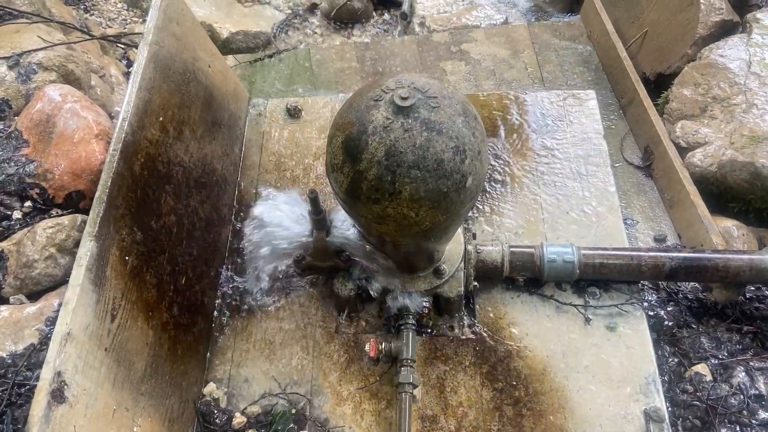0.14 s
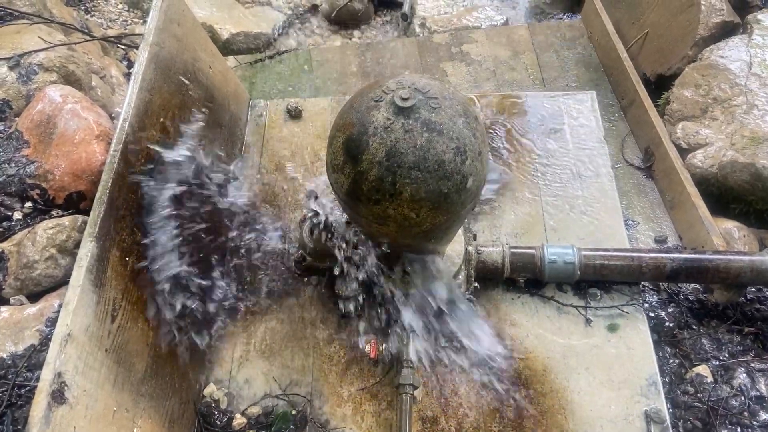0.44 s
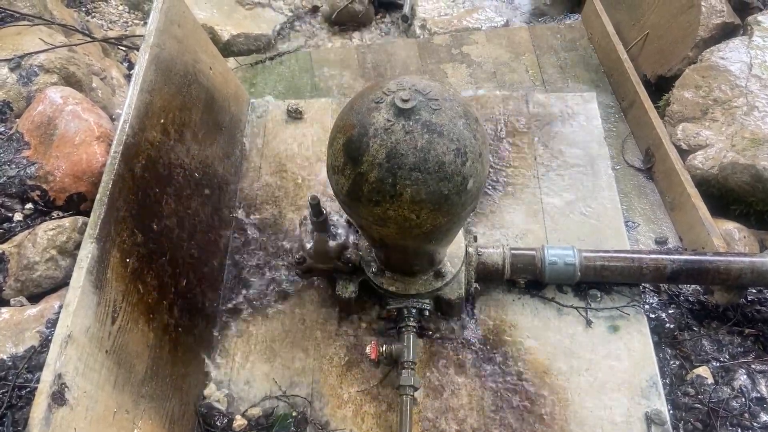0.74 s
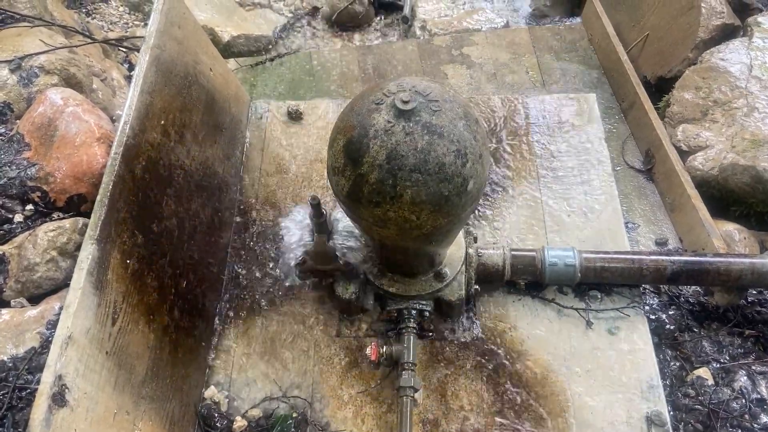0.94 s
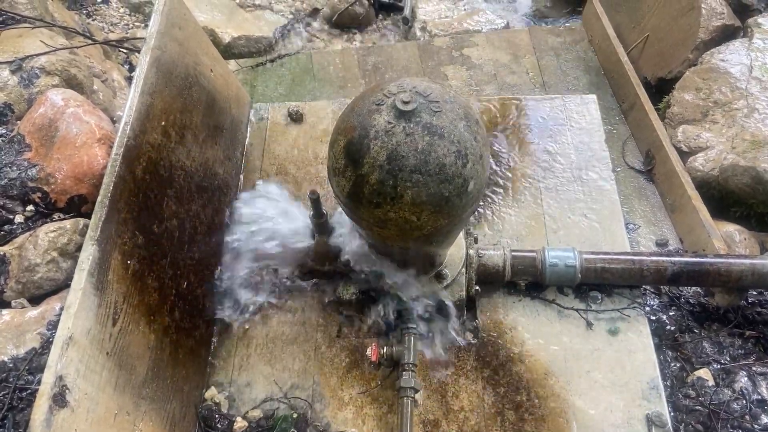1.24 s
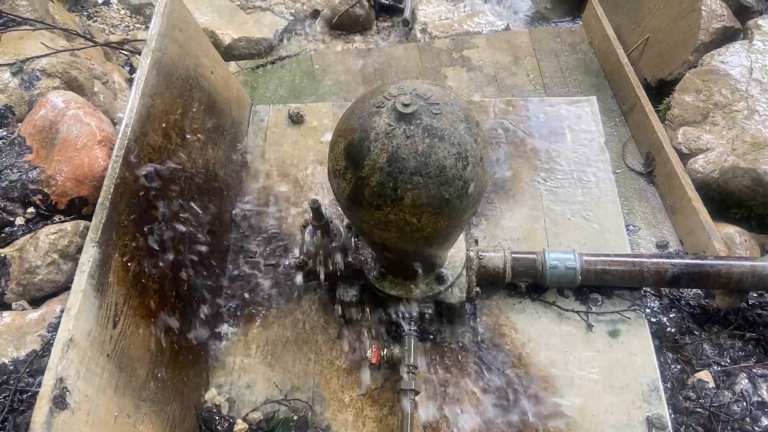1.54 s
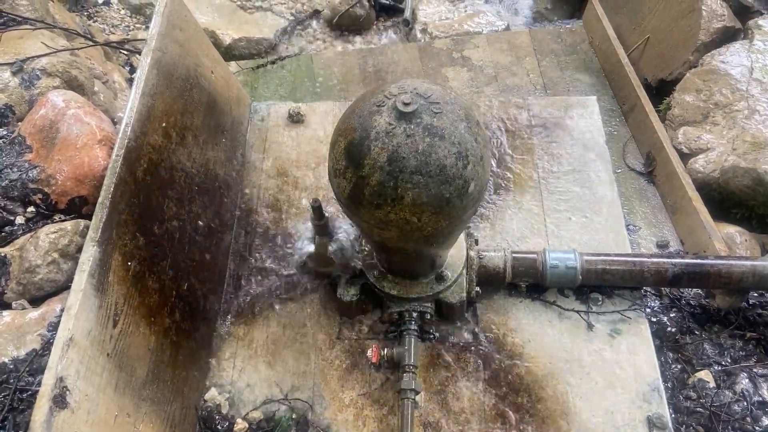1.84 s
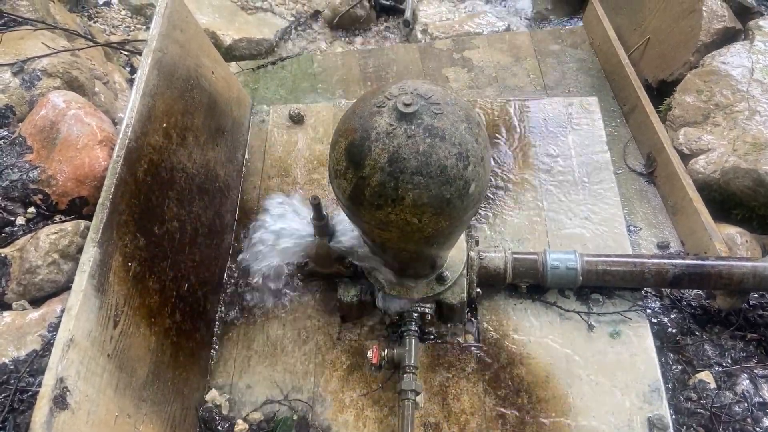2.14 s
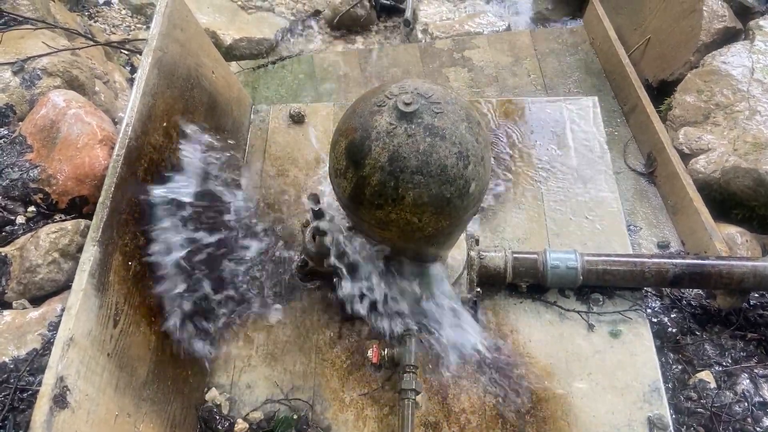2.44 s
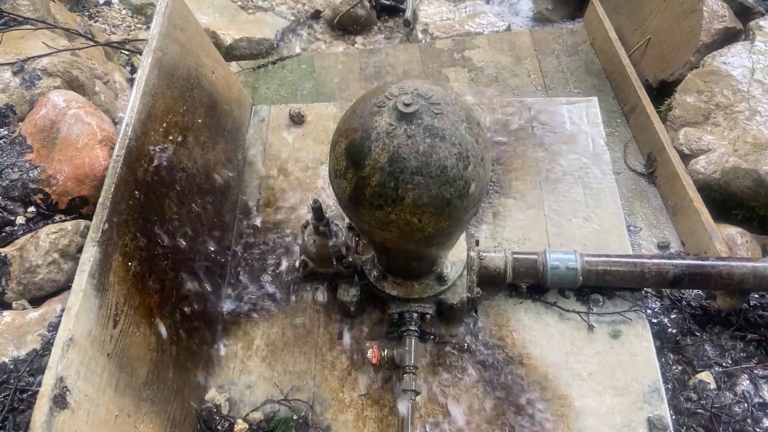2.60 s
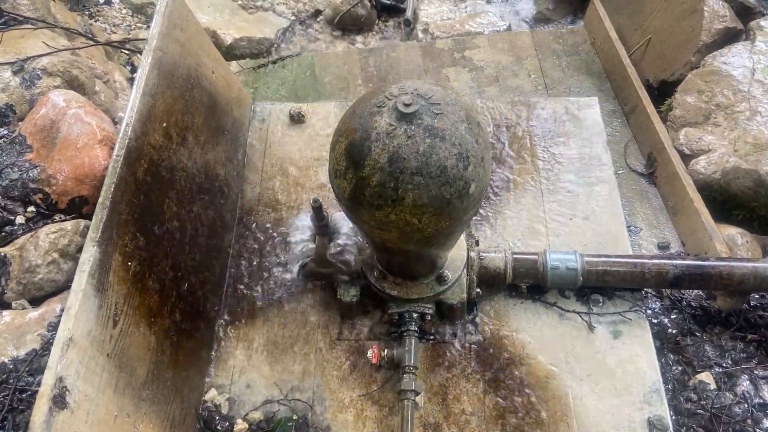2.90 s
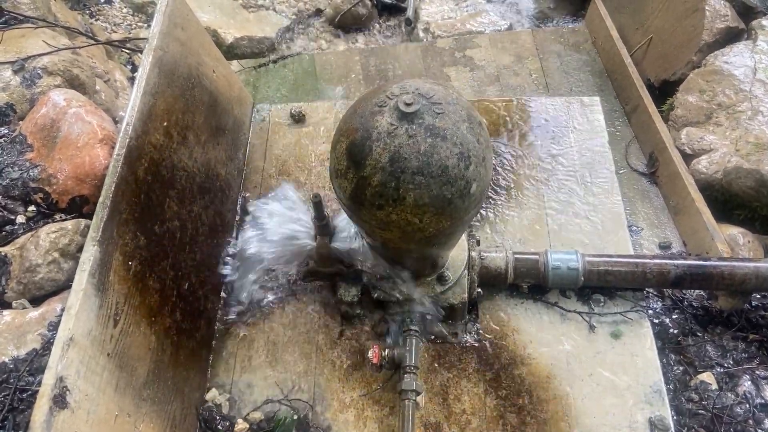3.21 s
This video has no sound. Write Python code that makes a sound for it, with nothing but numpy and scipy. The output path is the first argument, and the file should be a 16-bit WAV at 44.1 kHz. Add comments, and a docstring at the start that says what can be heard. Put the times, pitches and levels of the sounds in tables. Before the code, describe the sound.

A water ram pump knocks about once a second amid splashing, spattering and burbling water outdoors.

```python
"""Hydraulic ram pump beside a stream

A ram pump knocks about once a second on a concrete slab, heard from just above.
Waste water gushes until the valve slams: decaying modes sound the iron and base, a falling chirp the pipe.
Thrown water spatters on a board and the slab, made of shaped noise, random impacts and tiny bubbles.
Rising bubble tones give the steady burble of running water; single fat drops smack or plop."""
import sys
import numpy as np
from scipy import signal
from scipy.fft import rfft, irfft
from scipy.io import wavfile

SR = 44100
rng = np.random.default_rng(int(sys.argv[2]) if len(sys.argv) > 2 else 0)


def to_wav(s):
    """Save 16-bit WAV."""
    ch = np.atleast_2d(s).T  # columns
    pcm = np.round(np.clip(ch, -1, 1) * 32767)  # PCM
    wavfile.write(sys.argv[1], SR, pcm.astype(np.int16))


N = 148176
T = np.arange(N) / SR  # s
HZ = np.maximum(np.fft.rfftfreq(2 * N, 1 / SR), 1)  # bins of the zero-padded spectrum

# Running water, mid and side alike. Each row: frequency in Hz, density in dB per Hz.
STREAM_SPECTRUM = [(20, -83), (45, -69.5), (70, -78.5), (95, -67.5), (135, -62), (200, -67.5), (430, -76.5),
                   (600, -73), (780, -72.5), (1100, -77), (1500, -84.5), (2100, -79), (2500, -87),
                   (3100, -80), (3700, -96), (8000, -100)]
# Thrown water as spray, before its cycle. Each row: frequency in Hz, density in dB per Hz.
SPRAY_SPECTRUM = [(800, -85), (2000, -77), (3000, -76.5), (3650, -78), (4100, -74), (4450, -77.5),
                  (4800, -73), (5300, -74.5), (6300, -72.5), (7250, -70), (8000, -73.5), (8600, -81),
                  (9200, -125), (9900, -83.5), (11300, -86.5), (13000, -93.5), (13900, -93.5), (15000, -99)]
# Thrown water landing, before its swell. Each row: frequency in Hz, density in dB per Hz.
SPLASH_SPECTRUM = [(40, -71), (130, -61), (300, -66.5), (800, -68), (1500, -72), (3000, -91.5), (6000, -78),
                   (12000, -105)]
# Water leaving the waste valve, before its swell. Each row: frequency in Hz, density in dB per Hz.
GUSH_SPECTRUM = [(60, -87), (200, -80), (700, -77), (1200, -71.5), (2200, -78), (5000, -83), (12000, -100)]
# Spray through one cycle. Each row: time from closure in seconds, gain in dB.
SPRAY_CYCLE = [(-.4, -0.8), (-.2, -0.6), (-.01, 0.1), (.03, 6.5), (.08, 1.5), (.16, 2.5), (.3, 0),
               (.45, -1), (.6, -2.4)]
# Single loud drops on slab and puddles.
# Each row: start in seconds, level in dB, pitch in Hz, resonance width in Hz, swell time in seconds.
LOUD_DROPS = [(.0613, -29, 7100, 2500, .0012), (.0957, -27, 6460, 900, .0016),
              (.2723, -26, 7400, 3000, .0015), (.5652, -22, 6800, 6000, .0013),
              (1.252, -30, 2200, 2500, .003), (1.7554, -25, 4900, 3000, .0012),
              (2.6519, -28, 7600, 1200, .0015), (2.6823, -26, 6800, 900, .0016),
              (2.7142, -22.5, 7200, 2500, .0012), (2.8384, -27, 5500, 2200, .0013),
              (3.066, -38, 2080, 220, .007)]
# Valve closures. Each row: start in seconds, level in dB.
STROKES = [(0.338, 0), (1.3458, 0), (2.3581, 0)]
# Contacts within one closure. Each row: lag in seconds, level in dB.
CONTACTS = [(0.001, -6), (0.0035, -7), (0.0072, 0), (0.0118, -11), (0.0165, -12), (0.0208, -10),
            (0.0265, -11), (0.088, -15), (0.099, -16.5), (0.112, -19)]
# Modes of the iron body. Each row: frequency in Hz, relative level in dB, T60 in seconds.
IRON_MODES = [(463, -5.5, 0.08), (713, -0.5, 0.064), (736, -4.5, .035), (937, -0.5, 0.098),
              (1100, -19, 0.089), (1220, -0.5, 0.063), (1306, -5, 0.042), (1780, -10, 0.065),
              (1916, -14.5, 0.059), (2110, -17, 0.038), (2415, -12.5, 0.038), (2925, -7, .03),
              (3207, -29, 0.041), (4680, -17, 0.11)]
# Crack of each contact. Each row: frequency in Hz, relative gain in dB.
CRACK_SPECTRUM = [(150, -32), (330, -4), (650, 0.5), (1200, -5), (2200, -7), (3600, -16), (7000, -14),
                  (9200, -33), (10500, -21), (14000, -39)]
# Modes of the base and air vessel. Each row: frequency in Hz, level in dB, T60 in seconds.
BASE_MODES = [(120, -32.5, .35), (141.7, -20.7, .33), (182.5, -26.3, .33), (204.7, -21, .18),
              (255, -24, .05)]
# Modes of the recoiling water column as the valve reopens.
# Each row: frequency in Hz, level in dB, T60 in seconds.
RECOIL_MODES = [(67, -25.5, .27), (137, -24, .22), (200.5, -25, .17)]
# Bending wave of the drive pipe. Each row: frequency in Hz, relative gain in dB.
PIPE_SPECTRUM = [(45, -35), (70, 5), (95, -18), (125, 3.3), (160, 2.6), (230, 0), (320, -.5), (520, -22),
                 (900, -40), (3000, -100)]
# Gain of the stereo side signal. Each row: frequency in Hz, gain in dB.
SIDE_GAIN = [(60, -12), (150, -14.5), (300, -12.5), (650, -6), (1000, -2.5), (1500, 4.5), (2100, -7.5),
             (2750, -6), (3200, -8.5), (3700, -5.5), (4800, -2), (6800, -7), (7300, 1), (8000, 1),
             (9200, 29), (9900, 7.5), (11000, -1), (12000, -34), (13200, -25), (14000, 0), (15000, 19)]
# Stereo lean. Each row: frequency in Hz, left gain minus right gain in dB.
BALANCE = [(100, -0.2), (300, -4), (650, -7), (1300, 1.9), (2800, -2.5), (6000, -1)]

HUM_HZ, HUM_DB = 68.9, -48.5
HUM_WIDTH_HZ = 8.6  # of each of two equal resonances in series
# Shares are fractions of power; spreads scale exponential random draws.
BUBBLE_CYCLES, BUBBLE_SHARE, BUBBLE_SPREAD_DB = 33, 0.29, 2.5
DROPS_PER_S, DROP_SHARE, DROP_SPREAD_DB, DROP_T60_S = 2500, 0.34, 2, 0.0037
FIZZ_HZ, FIZZ_OCTAVES, FIZZ_T60_S, FIZZ_DB = 6510, 0.9, 0.019, -12.5  # octaves either way
CLUMPS_PER_S, CLUMP_DB = 26, 0.76
SPLASH_PEAK_S, GUSH_RISE_S, GUSH_DB = 0.067, 0.32, -4

PIPE_DB, PIPE_LAG_S, PIPE_SLOPE = 30.3, 0.0258, 1.108
PIPE_REF_HZ, PIPE_LOW_HZ = 250, 39.3  # lag is PIPE_LAG_S at the first, constant below the second
THUMP_LAG_S, RECOIL_LAG_S, RADIATE_HZ = 0.010, 0.0961, 58
IRON_DB, IRON_LOW_HZ, IRON_TOP_HZ = -17.5, 362, 5350
CRACK_DB, CRACK_T60_S, RATTLE_SHARE = -14, 0.027, 0.4
CONTACT_SCATTER_DB = 0.6
KNOCK_SIDE_LAG_S, KNOCK_SIDE_DB = 0.00107, -5.5
LOW_CUT_HZ, TOP_HZ = 34, 14700


def undb(db):
    """Amplitude ratio from dB."""
    return 10 ** (np.asarray(db) / 20)


def unit(x):
    """Scale to unit RMS."""
    return x / np.sqrt(np.mean(x ** 2))


def noise():
    """White noise of unit power."""
    return rng.standard_normal(N)


def gains(points):
    """Gain at every bin, interpolated in dB over log frequency."""
    hz, db = np.array(points, float).T
    return undb(np.interp(np.log(HZ), np.log(hz), db))


def shape(x, response):
    """Filter by a frequency response."""
    return irfft(rfft(x, 2 * N) * response)[..., :N]


def band(hz, width_hz):
    """Response of one resonance."""
    return 1 / (1 + 1j * (HZ - hz * hz / HZ) / width_hz)


def high_pass(x, hz):
    """Second-order low cut."""
    sos = signal.butter(2, hz, "high", fs=SR, output="sos")
    return signal.sosfilt(sos, x)


def delay(x, lag_s):
    """The same sound, later."""
    return np.interp(T - lag_s, T, x, left=0)


def fade(t60_s):
    """Exponential decay, 60 dB in t60_s."""
    return np.exp(-np.minimum(np.log(1000) * T / t60_s, 60))


def ring(modes):
    """Free ringing of a struck object: a sum of decaying sines."""
    return sum(undb(db) * np.sin(2 * np.pi * hz * T) * fade(t60_s) for hz, db, t60_s in modes)


def blend(grains, share):
    """Distinct grains over the noise wash of countless smaller ones."""
    share = np.clip(share, 0, 1)
    return np.sqrt(share) * unit(grains) + np.sqrt(1 - share) * noise()


def mid_side(place):
    """Mid and side weights of a grain, from a random place 0..1."""
    return [np.cos(2 * np.pi * place), np.sin(2 * np.pi * place)]


def water(grains, spectrum):
    """Give water grains a spectrum in dB per Hz."""
    return shape(grains, gains(spectrum)) * np.sqrt(SR / 2)


def burble(count=6000):
    """Bubbles that ring briefly and rise in pitch, in mid and side."""
    out = np.zeros((2, N))
    for when, pitch, size, place in rng.random((count, 4)):
        hz = 250 * 14 ** pitch
        life_s = BUBBLE_CYCLES / hz
        start = int(when * N)
        t = T[:min(int(life_s * SR), N - start)]
        tone = np.sin(2 * np.pi * hz * t * (1 + 0.088 * t / life_s))
        wave = tone * np.exp(-np.log(1000) * t / life_s)
        strength = hz * undb(-BUBBLE_SPREAD_DB * np.log(max(size, 0.01)))
        out[:, start:start + len(t)] += strength * np.outer(mid_side(place), wave)
    return np.array([blend(row, BUBBLE_SHARE) for row in out])


def stream():
    """Steady burbling, with the low hum of the pipe as resonant noise in mid."""
    hum = undb(HUM_DB) * unit(shape(noise(), band(HUM_HZ, HUM_WIDTH_HZ) ** 2))
    return water(burble(), STREAM_SPECTRUM) + np.outer([1, 0], hum)


def impacts(rate_per_s, spread_db):
    """Random impacts of either sign, many small and few large."""
    size = undb(spread_db * np.minimum(rng.exponential(size=N), 6))
    return (rng.random(N) < rate_per_s / SR) * size * rng.choice([-1, 1], N)


def patter():
    """Drops bursting on wet stone: shared hits, separate bursts in mid and side."""
    hits = impacts(DROPS_PER_S, DROP_SPREAD_DB)
    out = []
    for _ in range(2):
        burst = rfft(noise() * fade(DROP_T60_S), 2 * N)
        flat_burst = burst / np.abs(burst)  # keep only the phase
        out.append(blend(shape(hits, flat_burst), DROP_SHARE))
    return np.array(out)


def fizz(count=1400):
    """Tiny bubbles ping in the wet film as short decaying sines."""
    out = np.zeros((2, N))
    for when, pitch, size, place in rng.random((count, 4)):
        start = int(when * N)
        t = T[:min(int(FIZZ_T60_S * SR), N - start)]
        hz = FIZZ_HZ * 2 ** (FIZZ_OCTAVES * (2 * pitch - 1))
        strength = -np.log(max(size, 0.03))
        wave = strength * np.sin(2 * np.pi * hz * t) * np.exp(-np.log(1000) * t / FIZZ_T60_S)
        out[:, start:start + len(t)] += np.outer(mid_side(place), wave)
    return undb(FIZZ_DB) * unit(out)


def clumps():
    """Thrown water lands in uneven clumps: a random gain."""
    steps = rng.standard_normal(1000)
    return undb(CLUMP_DB * np.interp(T * CLUMPS_PER_S, np.arange(len(steps)), steps))


def waste_water():
    """The gush swells until the valve shuts; the thrown water lands and thins out to spray."""
    starts = np.array(STROKES)[:, 0]
    period = np.mean(np.diff(starts))
    age = (T - starts[0]) % period  # s since closure
    when, db = np.array(SPRAY_CYCLE).T
    spray_gain = undb(np.interp(age, when, db, period=period)) * clumps()
    spray = spray_gain * water(patter() + fizz(), SPRAY_SPECTRUM)
    splash_gain = age / SPLASH_PEAK_S * np.exp(1 - age / SPLASH_PEAK_S) * clumps()
    splash = splash_gain * water(patter(), SPLASH_SPECTRUM)
    gush_gain = undb(GUSH_DB) * np.exp((age - period) / GUSH_RISE_S)
    gush = gush_gain * water(burble(), GUSH_SPECTRUM)
    return spray + splash + gush


def drops():
    """Fat drops smack on the slab or plop into puddles: resonant noise that swells and dies."""
    out = np.zeros((2, N))
    for start, db, hz, width_hz, swell_s in LOUD_DROPS:
        age = np.maximum(T - start, 0) / swell_s
        response = band(hz, width_hz) ** 2 * gains(SPRAY_SPECTRUM)
        splat = unit(shape(rng.standard_normal((2, N)), response))
        out += undb(db) * age * np.exp(1 - np.minimum(age, 50)) * splat
    return out


def pipe_wave():
    """Low notes travel slowest, so the shock spreads along the pipe into a falling chirp."""
    lag = PIPE_LAG_S * (PIPE_REF_HZ / np.maximum(HZ, PIPE_LOW_HZ)) ** PIPE_SLOPE
    phase = 2 * np.pi * np.cumsum(lag) * SR / (2 * N)  # integral of lag over frequency
    return undb(PIPE_DB) * irfft(gains(PIPE_SPECTRUM) * np.exp(-1j * phase))[:N]


def body_boom():
    """Pipe chirp, base thump and water recoil; a small body radiates little deep bass."""
    thump = delay(ring(BASE_MODES), THUMP_LAG_S)
    recoil = delay(ring(RECOIL_MODES), RECOIL_LAG_S)
    return shape(pipe_wave() + thump + recoil, 1 / (1 + (RADIATE_HZ / HZ) ** 2))


def iron_rings():
    """Band-limited ringing of the iron body, one row per valve contact."""
    radiated = signal.butter(2, [IRON_LOW_HZ, IRON_TOP_HZ], "band", fs=SR, output="sos")
    iron = undb(IRON_DB) * signal.sosfilt(radiated, ring(IRON_MODES))
    return np.array([undb(db) * delay(iron, lag_s) for lag_s, db in CONTACTS])


def chatter_envelope():
    """Noise level of the chattering valve: the decays of all contacts, summed in power."""
    crack = fade(CRACK_T60_S)
    power = sum((undb(db) * delay(crack, lag_s)) ** 2 for lag_s, db in CONTACTS)
    return undb(CRACK_DB) * np.sqrt(power)


def knocks():
    """The valve chatters shut, rings the iron and shakes base and pipe, nearly alike every time."""
    boom, rings, chatter = body_boom(), iron_rings(), chatter_envelope()
    rattle = noise()  # the valve seat grates alike on every stroke
    mid, side = 0, 0
    for start, db in STROKES:
        grit = unit(shape(blend(rattle, RATTLE_SHARE), gains(CRACK_SPECTRUM)))
        contact_gains = undb(CONTACT_SCATTER_DB * rng.standard_normal(len(rings)))
        clank = contact_gains @ rings + chatter * grit
        mid = mid + undb(db) * delay(boom + clank, start)
        side = side + undb(db + KNOCK_SIDE_DB) * delay(clank, start + KNOCK_SIDE_LAG_S)
    return np.array([mid, side])


def scene():
    """Sum the sources in mid and side, then turn them into left and right."""
    mid, side = stream() + waste_water() + drops() + knocks()
    side = shape(side, gains(SIDE_GAIN))
    lean = np.sqrt(gains(BALANCE))  # half the difference to each channel
    return np.array([shape(mid + side, lean), shape(mid - side, 1 / lean)])


def record(dry):
    """Cut the rumble gently and the top steeply."""
    top_cut = signal.ellip(10, 0.2, 80, TOP_HZ, fs=SR, output="sos")  # ripple and stopband in dB
    return signal.sosfilt(top_cut, high_pass(dry, LOW_CUT_HZ))


dry = scene()
out = record(dry)
to_wav(out)
```